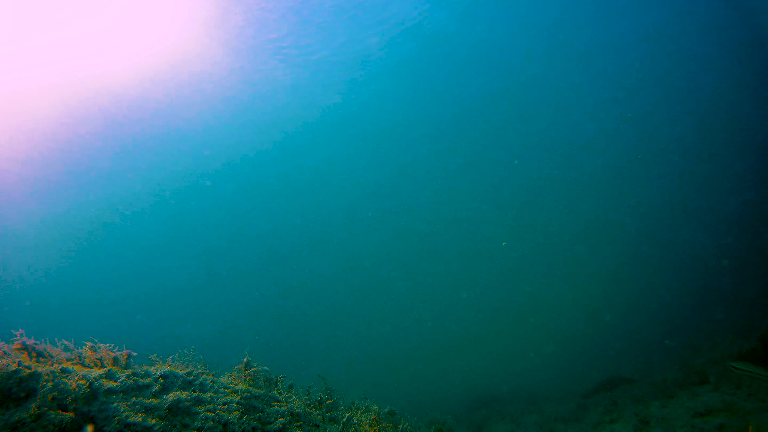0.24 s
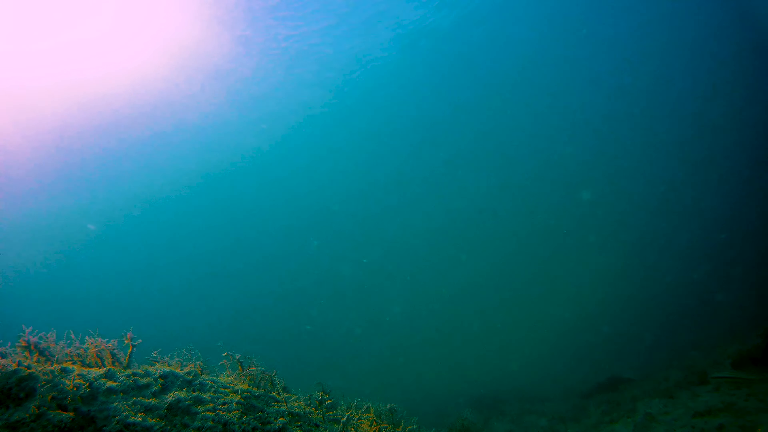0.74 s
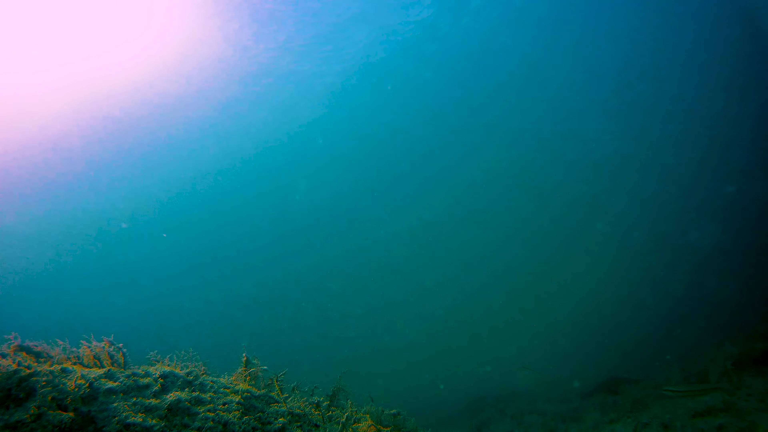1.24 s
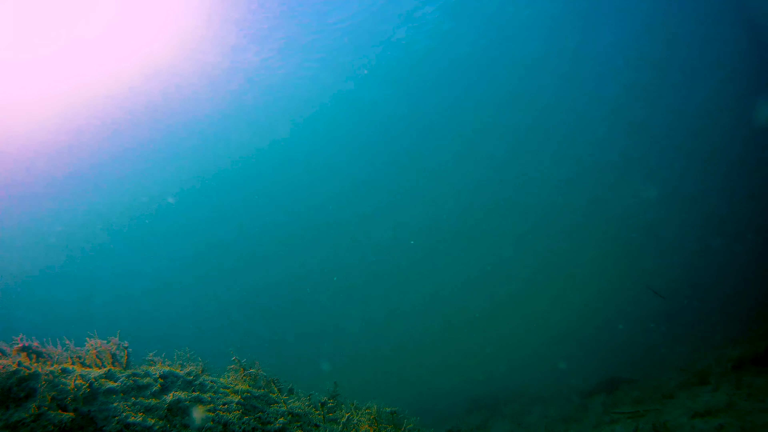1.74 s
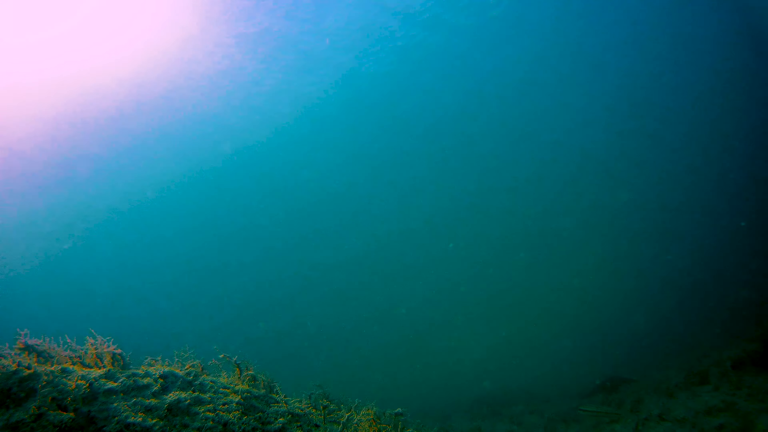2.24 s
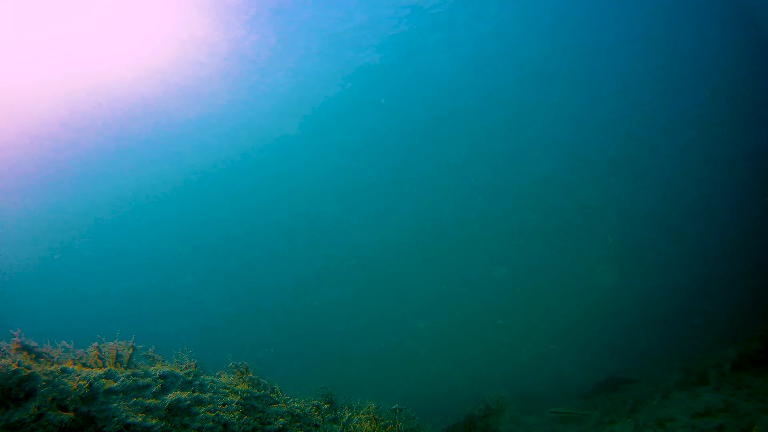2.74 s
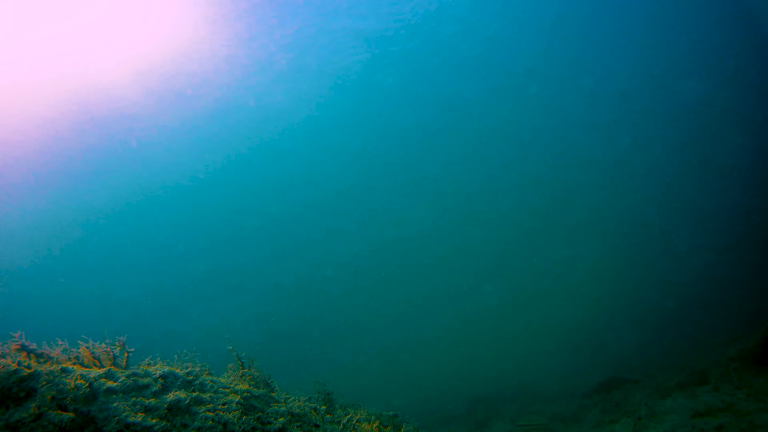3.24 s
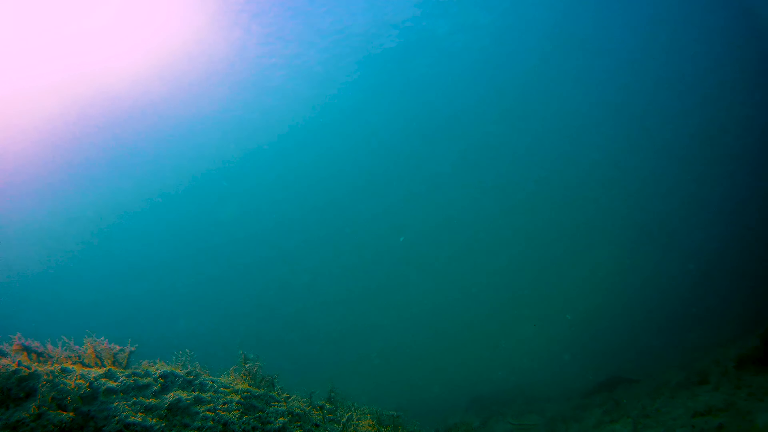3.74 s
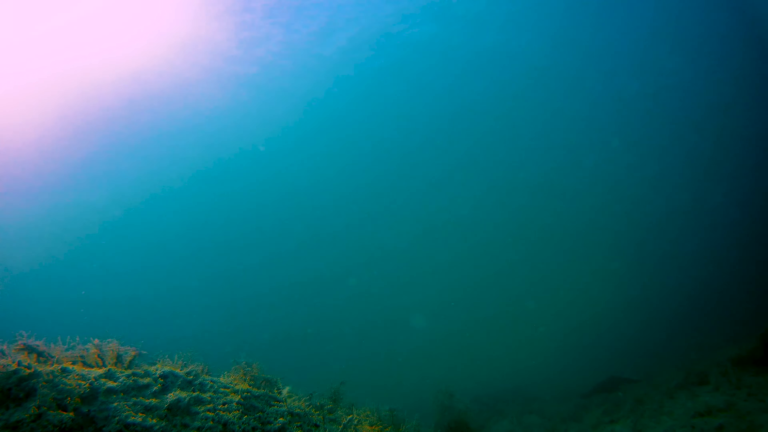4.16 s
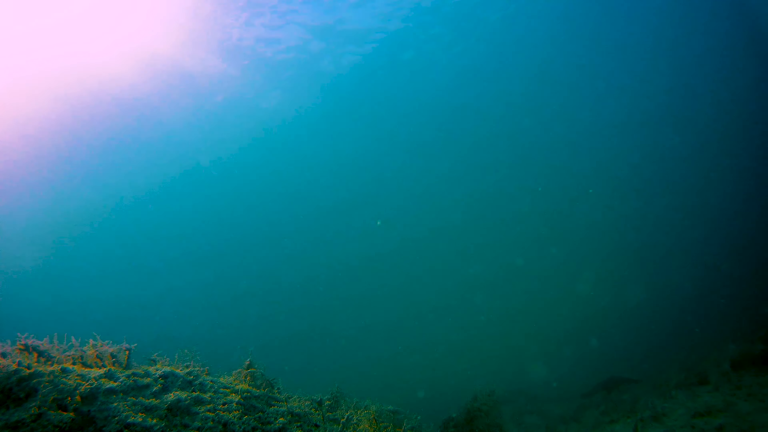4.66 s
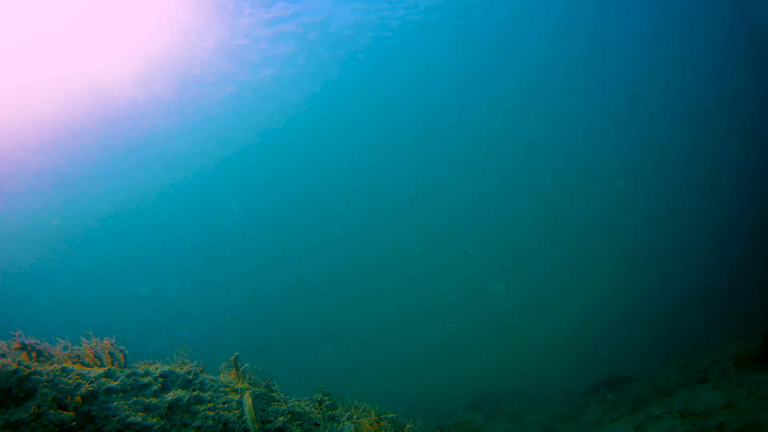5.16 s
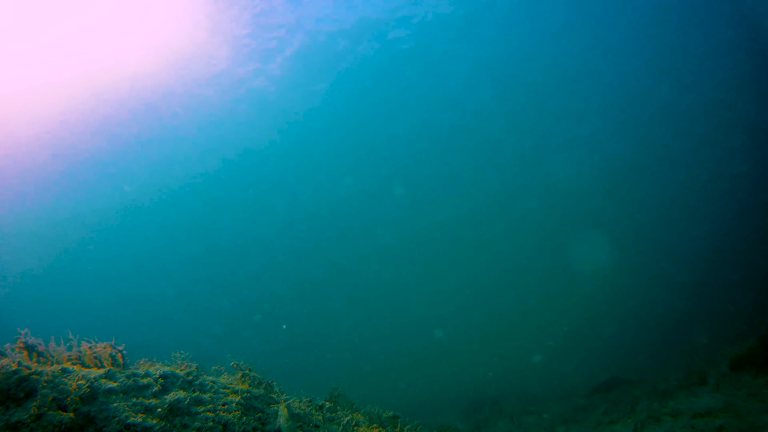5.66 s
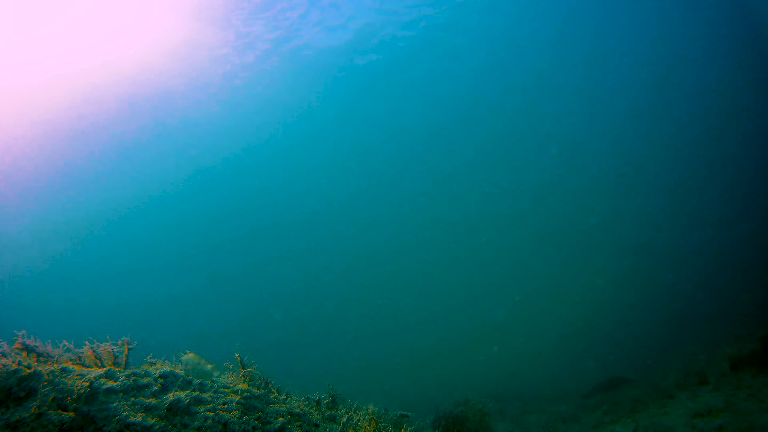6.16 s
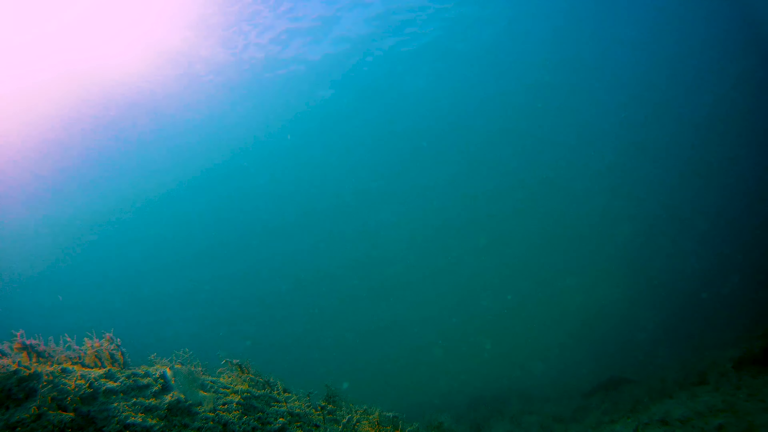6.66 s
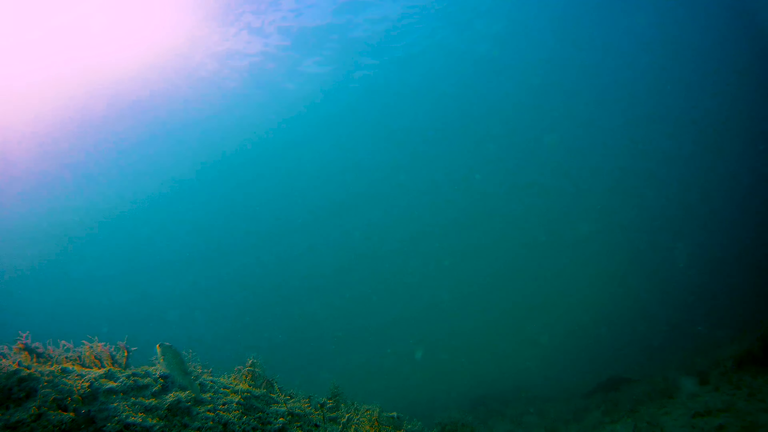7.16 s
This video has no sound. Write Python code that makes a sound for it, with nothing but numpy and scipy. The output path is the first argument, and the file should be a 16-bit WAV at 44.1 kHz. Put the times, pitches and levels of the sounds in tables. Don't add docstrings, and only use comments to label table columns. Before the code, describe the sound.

Muffled, bass-heavy underwater sound, very close and enclosed. Low throbbing surges rock the mount while turbulent water buffets and slaps the casing. Tiny dry ticks, glassy snaps and faint gritty crackle run all along, with occasional dull bumps. The current eases past the middle, exposing the ticks, then comes a small pebble knock, a soft low thud and swelling flow again.

```python
import sys
import numpy as np
from scipy import signal
from scipy.fft import rfft, irfft
from scipy.io import wavfile
from scipy.ndimage import uniform_filter1d

SR = 44100
rng = np.random.default_rng(int(sys.argv[2]) if len(sys.argv) > 2 else 0)


def decibels_to_gain(level_db):
    exponent = np.asarray(level_db, float) / 20
    return 10 ** exponent


def transcribe(u):
    v = np.clip(np.atleast_2d(u).T, -1, 1)
    q = np.round(v * 32767).astype(np.int16)
    wavfile.write(sys.argv[1], SR, q)


N = 325899

# frequency in Hz, density in dB per Hz.
HISS_SPECTRUM = [(410, -19), (700, 1.5), (1100, -4.5), (1650, -8), (3320, -14.5), (4590, -17),
                 (6440, -19.5), (15600, -21)]
HISS_DB = -61

# time in seconds, level in dB.
HEAVE_LEVEL = [(0.0, -45), (0.08, -62), (0.14, -46), (0.25, -42), (1.11, -50), (1.17, -42), (1.54, -58),
               (2.86, -38), (3.04, -52), (3.81, -41), (3.93, -52), (4.4, -45), (4.47, -53), (5.02, -43),
               (5.72, -53), (5.86, -36), (5.91, -45), (7.39, -41)]
HEAVE_HZ, HEAVE_GAIN_DB = 64, 1

# mode in Hz, level in dB, T60 in seconds.
BACK_MODES = [(1052, -7, 0.01), (1290, -11, 0.028), (1439, -1.5, 0.024), (1637, -2, 0.027)]
SIDE_MODES = [(1970, -2.5, 0.021), (2295, -1.5, 0.019), (2660, -3.5, 0.016), (2986, -7.5, 0.015)]
PORT_MODES = [(3330, -7, 0.0067), (3694, -10, 0.014), (3880, -1.5, 0.013), (4116, -2, 0.012)]
RIM_MODES = [(4560, -14, 0.0081), (4910, -12, 0.018), (5333, -6.5, 0.019), (5585, -4.5, 0.01),
             (5836, -4.5, 0.015), (5970, -14, 0.01), (6520, -20, 0.0053)]
LENS_MODES = [(6860, 3, 0.0085), (7550, 3.5, 0.0086), (7800, -4.5, 0.0055), (9170, -1.5, 0.011),
              (10180, 1.5, 0.0095), (10920, 2.5, 0.0085), (13800, 3, .006)]

# start in seconds, strength in dB, walls in dB re strength.
RIM_GRAINS = [(0.0362, -33.5, -12), (0.128, -51, -6), (0.1734, -43.5, -10), (0.1994, -51, -18),
              (0.2833, -50.5, -4), (0.383, -53, -8), (0.8203, -46, -15), (0.923, -50.5, -8),
              (1.121, -47.5, -22), (1.3646, -48.5, -9), (1.3758, -47.5, -1.5), (1.5955, -42.5, -7.5),
              (1.8083, -48.5, -7), (1.8673, -41, -14), (2.0468, -41, -4), (2.121, -41.5, -12),
              (2.642, -37, -4), (3.2694, -42, -7.5), (3.5318, -43, -9.5), (3.801, -40.5, -11.5),
              (4.577, -45, -8), (4.75, -41.5, -5.5), (4.8189, -41.5, -17), (4.9309, -45, -7),
              (5.222, -40, -6.5), (5.229, -33.5, -13.5), (5.7344, -46, -11), (6.0611, -47, -10),
              (6.3828, -36, -12.5), (6.7316, -49, -5)]
# start in seconds, strength in dB, side wall and rim in dB re strength.
BACK_GRAINS = [(0.4289, -39.5, -3.5, -12), (0.4346, -39, -5, -9), (0.517, -42, -15, -24),
               (0.521, -42.5, -15, -10.5), (0.5379, -37, -3.5, -18), (0.6674, -46.5, -8, -5.5),
               (0.9484, -45, -6, -11), (1.4006, -34, -13, -28), (2.1267, -47, -14, -22),
               (2.81, -51, -1, -0.5), (3.978, -46.5, 0, -11), (4.2242, -41.5, -11, -16),
               (4.273, -46, -5, -3.5), (4.534, -43, -7, -19.5), (4.588, -39, -14, -22),
               (4.5924, -43.5, -10, -16.5), (4.7561, -53, -6, -9), (5.0435, -41, -13, -21),
               (5.055, -45.5, -5, -7), (5.44, -51.5, 2, -8), (5.5587, -43.5, -2, -9), (5.979, -45, -9, -12),
               (6.4652, -42, -14.5, -21), (6.6018, -36, -6, -18), (7.0652, -43.5, -6, -17),
               (7.0782, -44.5, -5, -12), (7.1481, -37.5, -6, -15), (7.214, -46.5, -2.5, -5)]
# start in seconds, strength in dB, back wall and rim in dB re strength.
SIDE_GRAINS = [(0.353, -39.5, -11, -14), (1.715, -39, -15, -17), (2.2302, -41, -24, -11),
               (2.27, -41, -12, -8.5), (2.37, -41.5, -17, -16), (2.6759, -49, -3, -10),
               (3.244, -49, -1, -10), (3.8142, -44, -14, -16), (4.3212, -49.5, -9, -8),
               (4.9608, -39, -13, -6), (5.211, -38.5, -8, -13), (5.76, -52.5, -2, 2),
               (6.268, -47.5, -17, -11), (6.4889, -47.5, -6, -6), (7.098, -44.5, -13, -6),
               (7.105, -44.5, -8, -8)]
# start in seconds, strength in dB, walls and rim in dB re strength.
PORT_GRAINS = [(0.9028, -51.5, -3, -2), (1.669, -52, 1, 1.5), (1.978, -48.5, -3, -2), (2.8801, -49, -6, 7),
               (2.8862, -40, -10, -3), (3.0136, -40.5, -0.5, -19), (3.256, -57, 1, 1),
               (3.3128, -52.5, -3, 2), (4.0443, -53, 4, 1), (4.0509, -51.5, 6, 2), (4.0581, -42.5, 2, -7.5),
               (4.2776, -47, 0, 0.5), (4.4658, -54.5, 0, 3.5), (6.844, -48, -2.5, -3)]
# start in seconds, strength in dB, walls in dB re strength.
RIM_SPECKS = [(0.2294, -48, -16), (0.418, -49, -8), (0.6165, -53, -12), (0.6938, -48, -4),
              (0.7432, -50, -8), (0.892, -45, -10), (0.9866, -53.5, -8), (1.071, -45, -11),
              (1.3324, -49, -6), (1.4416, -53, -8), (1.4626, -49, -10), (1.6222, -49, -8),
              (1.8452, -46, -9), (2.0701, -48, -8), (2.4708, -53, -5), (2.5765, -50, -8), (2.7217, -49, -6),
              (3.0053, -49, -4), (3.1382, -54, -8), (4.3046, -44, -11), (4.3982, -51, -8),
              (4.4877, -48, -5), (4.859, -50, -8), (4.9232, -43.5, -8), (5.1028, -49, -8.5),
              (5.1277, -46, -12), (5.719, -47, -5), (5.8731, -49, -6), (6.0851, -52, -9), (6.3344, -58, -8),
              (6.5547, -51, -3), (6.7456, -45, -9), (6.9008, -47, -8)]
# start in seconds, strength in dB, side wall and rim in dB re strength.
WALL_SPECKS = [(0.8036, -47, -3, -16), (2.9138, -45, -7, -8), (3.2337, -42.5, -3, -17),
               (3.4293, -46, -3, -12), (3.4835, -47, 0, -12), (3.576, -50.5, 4.5, -2),
               (3.7493, -48, -3, -8), (3.8776, -45, -5, -10), (4.0157, -48, -3, -14),
               (4.2068, -44, -4, -15), (4.2462, -48, -6, -15), (4.348, -48, -1, -12),
               (4.6818, -49, -3, -12), (4.8967, -54, -3, -14), (5.1163, -48, -5, -12),
               (5.5179, -45.5, -5, -12), (5.7922, -45, -2, -8), (6.4275, -50, 0, -12),
               (6.6864, -52, -3, -15), (6.8648, -47, -8, -14), (6.8823, -46, -4, -14),
               (6.9521, -55, -0.5, -12), (6.9805, -51, -5, -12), (7.0474, -45, -7, -7)]
# list of times in seconds, levels of back, side, port and rim in dB.
SAND = [
    ([.139, .939, 1.091, 1.639, 1.682, 1.752, 1.892, 2.257, 2.292, 2.344, 2.653, 2.915, 2.953, 2.982, 3.515, 3.705, 3.923, 4.083, 4.426, 4.46, 4.953, 5.308, 5.58, 5.649, 5.698, 5.814, 5.93, 6.022, 6.208, 6.525, 6.549, 6.919, 7.211], [-64, -62, -66, -55]),
    ([.013, .73, 1.057, 2.03, 2.144, 2.694, 3.846, 4.117, 4.145, 4.365, 5.92, 6.26, 6.726], [-62, -62, -58, -60]),
    ([.002, .68, 1.421, 2.042, 4.499, 6.482], [-50, -56, -60, -56]),
]
STRUCK_DB, COUPLED_DB, PORT_LEAK_DB, SPECK_DB = -2, 2, -4, -2.5
GRAIN_LAG_S, SAND_LEAD_S = .0006, .002

# start in seconds, strength in dB, pitch in Hz.
LENS_SNAPS = [(0.0373, -49, 7200), (0.174, -51, 7190), (0.2294, -49, 7360), (0.5222, -44, 10500),
              (0.82, -51, 6800), (1.1215, -49.5, 7650), (1.3653, -51, 6980), (1.4631, -51, 7600),
              (1.715, -46, 7400), (1.8682, -45, 7630), (1.9784, -48, 10700), (2.047, -50, 10700),
              (2.0906, -50, 10600), (2.1215, -48, 7410), (2.2298, -42, 6900), (3.3129, -48, 6830),
              (3.5324, -48, 7010), (4.3211, -49, 10600), (4.4648, -51, 6820), (4.5775, -46, 6820),
              (4.7501, -44, 6986), (4.9227, -52, 10840), (5.2218, -51, 7490), (5.2932, -49, 7610),
              (5.6332, -49, 7350), (5.7344, -48, 9170), (6.0621, -50, 7460), (6.3834, -49, 7680),
              (6.6019, -40, 7350), (6.7321, -50, 6800), (7.1048, -50, 8960), (7.1277, -51, 7240),
              (7.1487, -50, 7550)]
SNAP_DB, SNAP_T60_S = 4, .009

# mode in Hz, level in dB, T60 in seconds.
PEBBLE_MODES = [(297, -32, 0.045), (410, -22, 0.04), (525, -15.5, 0.041), (664, -16.5, 0.03),
                (870, -23.5, 0.033), (1266, -21, 0.03), (1385, -15.5, 0.027), (1660, -13, 0.024),
                (1950, -22, 0.024), (2390, -29, 0.017)]
# mode in Hz, level in dB, T60 in seconds.
THUD_MODES = [(820, -38, 0.03), (667, -29, 0.045), (561.7, -26, 0.075), (488, -40, 0.045),
              (401, -26.5, 0.092), (347, -34, 0.11), (270, -25.5, 0.072), (188, -36.5, 0.12),
              (122, -18.5, 0.15), (90, -25, 0.2)]
PEBBLE_S, THUD_S = 5.2929, 5.764
# start in seconds, mode in Hz, level in dB, T60 in seconds.
BUMPS = [(.008, 1040, -42.5, 0.074), (.075, 506, -20, 0.044), (0.075, 850, -40, 0.041),
         (0.27, 122, -29, 0.25), (0.873, 630, -45, 0.037), (1.024, 270, -21.5, 0.05),
         (2.001, 147, -37, 0.17), (2.809, 510, -25, 0.034), (3.383, 650, -34, 0.045),
         (4.528, 129, -36, 0.26), (4.76, 129.5, -31, 0.13), (4.772, 330, -36, 0.055),
         (4.751, 670, -39, 0.046), (5.991, 122, -32, 0.2), (6.36, 120, -35, .15),
         (7.065, 120.3, -25.5, 0.15), (0.5383, 2050, -36, .022), (1.401, 1450, -38, .03),
         (2.371, 2300, -43, .02), (6.4655, 1451, -43, .03), (5.785, 350, -32, 0.11), (5.8, 150, -31, .12),
         (5.804, 420, -40, 0.06), (7.045, 352, -39, 0.1), (7.0646, 1620, -46, .03)]

# start in seconds, level in dB, mode in Hz.
SLAPS = [(0.076, -32, 450), (0.2, -36, 200), (0.311, -30, 218), (0.6, -31, 84), (0.684, -31, 178),
         (0.816, -33, 253), (1.02, -31, 221), (1.158, -30, 226), (1.479, -27, 285), (1.616, -33, 186),
         (1.696, -33, 240), (1.817, -26, 223), (1.93, -32, 151), (2.161, -35, 164), (2.485, -29, 153),
         (2.53, -30, 85), (2.593, -31, 204), (2.704, -27, 181), (3.414, -33, 176), (3.536, -32, 199),
         (3.882, -33, 183), (3.31, -33, 82), (5.768, -32, 400), (6.218, -31, 207.1)]
SLAP_DB, SLAP_CYCLES = -4, 16

# time in seconds, strength in dB, share of small eddies in dB.
FLOW = [(0.0, 0, 1.5), (0.41, 1.5, -3), (1.21, 2, -0.5), (1.46, 2, -1), (2.12, -0.5, 1), (2.47, 3.5, -2.5),
        (2.72, 0.5, -0.5), (3.46, 0, -0.5), (4.2, -1, -2.5), (4.49, -9, -0.5), (4.94, -15.5, 0.5),
        (5.54, -15, -0.5), (6.01, -5.5, -3.5), (6.75, -8.5, -3.5), (7.22, -2, -1.5), (7.39, 0.5, -6.5)]
# centre in Hz, width in Hz, level in dB.
BUFFET_BANDS = [(27.1, 7, -2.5), (42.8, 11.6, -2.5), (63.3, 7.4, -12)]
DEEP_BANDS = [(68.4, 16, -1.5), (87.2, 20.5, -1.5), (122, 23.3, -4), (332.2, 25, -15)]
DRUM_BANDS = [(173.7, 48, 0.5), (218.4, 77, 0), (304, 80, -5)]
PATTER_BANDS = [(432, 55, -5), (500, 124, 4), (654.6, 59, -5), (709, 28, -12), (873, 92, -16.5),
                (1243, 39, -17.5), (1425, 83, -19), (1665, 99, -23)]
DRUM_DB, PATTER_DB, DEEP_DB, BUFFET_DB = -43.5, -49, -45.5, -41
PATTER_DB_PER_DB, DEEP_DB_PER_DB = 0.7, 0.27

# time in seconds, frequency in Hz.
LOW_PITCH = [(0.0, 32.5), (0.29, 34.5), (1.81, 35), (2.57, 32), (3.7, 31.5), (4.16, 35.5), (4.61, 33.5),
             (5.41, 32), (6.09, 36.5), (6.79, 33.5), (7.29, 35.5), (7.39, 43)]
HIGH_PITCH = [(0.0, 50), (0.25, 55.1), (0.35, 51.68), (1.44, 51.94), (1.56, 49.2), (1.91, 54.56),
              (3.38, 50.77), (3.5, 55.47), (4.57, 53.37), (4.69, 46.8), (4.79, 50.38), (5.41, 50.5),
              (5.6, 54.81), (6.79, 52.55), (7.0, 59.7), (7.18, 52.2), (7.39, 52.8)]
# crest in seconds, level in dB,
# build-up and fade in seconds per 10 dB.
LOW_SURGES = [(0.1, -38, 7, 1.5), (.37, -27, 0.5, 0.04), (.72, -27, 0.2, 0.07), (.88, -27, -0.8, 0),
              (1.29, -29, -0.1, 0.3), (2.1, -31.5, 0.26, 0.4), (2.3, -31.5, -0.5, 3.5),
              (3.04, -27, 0.2, 0.7), (3.93, -26.5, 0.2, -0.5), (4.28, -28.5, -0.5, 1.2),
              (4.75, -27.5, 1.2, 0.2), (5.11, -25, 0.06, 0.05), (5.3, -32.5, 2, -0.1),
              (5.68, -33, -0.74, 0.4), (5.91, -23.5, 0, -0.46), (6.1, -29, 0.02, .5), (6.3, -29, 0.47, -2),
              (6.46, -27.5, 0.5, -0.2), (6.62, -28, 0.2, 0.7), (7.0, -27.5, 1.1, 0.3),
              (7.22, -23.5, 0.14, 0.16)]
HIGH_SURGES = [(.08, -25, 0.068, 0.14), (.54, -21.5, 0.12, 0.12), (.88, -26.5, .25, 0.23),
               (1.42, -24.5, 0.06, 0.11), (1.83, -26.5, 0.39, 0.14), (2.1, -28.5, 0.27, 0.066),
               (2.51, -25.5, 0.23, 0.13), (2.82, -27, 0.1, 0.27), (3.24, -26, 0.11, 0.078),
               (3.52, -24.5, 0.066, 0.074), (3.85, -29.5, 0.22, 0.21), (4.14, -23.5, 0.14, 0.18),
               (4.45, -24, .35, 0.15), (4.76, -27, 0.038, 0.26), (5.0, -22, 0.18, 0.048),
               (5.14, -27, 0.12, 0.055), (5.33, -25.5, 0.12, 0.091), (5.7, -29.5, 0.28, 0.23),
               (6.11, -27.5, 0.044, 0.11), (6.32, -29.5, 0.061, 0.2), (6.71, -30.5, 0.1, .09),
               (7.11, -31.5, 0.041, 0.34), (7.25, -35.5, 0.36, 0.098)]

DULL_START_S = [.017, .53, 2.225, 2.641, 2.865, 2.993, 3.792, 4.738, 5.187, 5.211, 5.235, 5.259, 5.282,
                6.371, 6.594, 7.139]
DULL_LENGTH_S = .029


def unit(x):
    return x / np.sqrt(np.mean(x ** 2))


def curves(table):
    s, *columns = np.transpose(table)
    return [np.interp(np.arange(N) / SR, s, c) for c in columns]


def walk(rate_hz):
    hold = int(SR / rate_hz)
    steps = np.repeat(rng.standard_normal(N // 50), hold)[:N + hold]
    slewed = uniform_filter1d(uniform_filter1d(steps, hold), hold)
    return unit(slewed[:N])


def resonance(x, hz, width_hz):
    return signal.lfilter(*signal.iirpeak(hz, hz / width_hz, SR), x)


def ring(hz, db, t60_s, rise_s):
    t = np.arange(8192 if t60_s > .03 else 2048) / SR
    envelope = decibels_to_gain(db - 60 * t / t60_s) * (1 - np.exp(-t / rise_s)) ** 2
    return envelope * np.sin(2 * np.pi * hz * t)


def add(out, s, sound):
    i = int(s * SR)
    out[i:i + len(sound)] += sound[:len(out) - i]


def hiss():
    hz, db = np.transpose(HISS_SPECTRUM)
    bin_hz = np.arange(N // 2 + 1) * SR / N + 1
    colour = decibels_to_gain(np.interp(np.log(bin_hz), np.log(hz), db))
    noise = unit(irfft(rfft(rng.standard_normal(N)) * colour, N))
    return decibels_to_gain(HISS_DB + 1.6 * walk(35)) * noise


def heave():
    wobble_rad = 1.3 * walk(7)
    level = decibels_to_gain(curves(HEAVE_LEVEL)[0] + HEAVE_GAIN_DB)
    return np.sqrt(2) * level * np.sin(2 * np.pi * HEAVE_HZ * np.arange(N) / SR + wobble_rad)


def tick(levels_db, chance):
    groups = zip((BACK_MODES, SIDE_MODES, PORT_MODES, RIM_MODES, LENS_MODES), levels_db)
    modes = [(hz, db + level, t60) for group, level in groups for hz, db, t60 in group]
    out = 0
    for (hz, db, t60), (sign, detune, size) in zip(modes, chance):
        mode = ring(hz * (1 + .02 * detune), db + 2.8 * size, t60, 0.00036)[:2048]
        out = out + np.sign(sign + .8) * mode
    return out


def crackle(count=14):
    out, gust = np.zeros(N), decibels_to_gain(3.5 * walk(14))
    for _ in range(count):
        size_db = np.minimum(4 * rng.exponential(size=N), 6)
        strikes = (rng.random(N) < 26 * gust / SR) * decibels_to_gain(size_db)
        levels_db = [-71.5, -72, -73.5, -68, -76] + 4.94 * rng.standard_normal(5)
        body = tick(levels_db, rng.standard_normal((26, 3)))
        out += signal.oaconvolve(strikes, body)[:N]
    return out


def landings():
    lead, near = STRUCK_DB, COUPLED_DB

    def port(side, rim):
        return min(side, rim) + near + PORT_LEAK_DB

    rows = []

    def land(s, db, *parts_db):
        rows.append((s, db + np.array(parts_db)))

    for s, db, wall in RIM_GRAINS:
        land(s, db, wall, wall, port(wall, 0), lead)
    for s, db, side, rim in BACK_GRAINS:
        land(s, db, lead, side + near, port(side, rim), rim + near)
    for s, db, back, rim in SIDE_GRAINS:
        land(s, db, back + near, lead, port(0, rim), rim + near)
    land(PEBBLE_S - GRAIN_LAG_S, 0, -58, -58, -49, -41.5)
    for s, db, wall, rim in PORT_GRAINS:
        land(s, db, wall, wall, lead, rim + near)
    for s, db, wall in RIM_SPECKS:
        land(s, db + SPECK_DB, wall, wall, port(wall, 0), lead)
    for s, db, side, rim in WALL_SPECKS:
        land(s, db + SPECK_DB, lead, side, port(side, rim), rim)
    for times_s, levels_db in SAND:
        for s in times_s:
            land(s - SAND_LEAD_S, 0, *levels_db)
    return rows


def ticks():
    out = np.zeros(N)
    chance, spin = rng.standard_normal((200, 2, 26, 3)), rng.random((200, 2))
    for (s, levels_db), c, (late, glance) in zip(landings(), chance, spin):
        lens_db = max(levels_db[-1], levels_db[1] - 5.5) + 12 * glance
        levels_db = np.append(levels_db, lens_db) + [2.0, 2.0, 4.0, 3.5, -20]
        add(out, s + GRAIN_LAG_S, tick(levels_db, c[0]))
        add(out, s + .002 + 0.0067 * late, tick(levels_db - 14, c[1]))
    return out


def snaps():
    out = np.zeros(N)
    for (s, db, hz), spread in zip(LENS_SNAPS, rng.standard_normal((60, 3))):
        for d in (0, *spread):
            mode_hz = min(hz * (1 + .07 * d), 15000)
            add(out, s, ring(mode_hz, db + SNAP_DB - 4 * abs(d), SNAP_T60_S, 0.00016) / 3)
    return out


def knocks():
    out = np.zeros(N)
    for hz, db, t60 in PEBBLE_MODES:
        add(out, PEBBLE_S + .12 / hz, np.sign(1500 - hz) * ring(hz, db, t60, .0007 + 0.25 / hz))
    for k, (hz, db, t60) in enumerate(THUD_MODES):
        add(out, THUD_S + 1.64 / hz, (-1) ** k * ring(hz, db, t60, 0.9 / hz))
    for s, hz, db, t60 in BUMPS:
        add(out, s, ring(hz, db, t60, 0.68 / hz))
    return out


def slaps():
    out = np.zeros(N)
    for s, db, hz in SLAPS:
        add(out, s, ring(hz, db + SLAP_DB, SLAP_CYCLES / hz, 0.99 / hz))
    return out


def eddies(bands, flicker_db, rate_hz):
    out = 0
    for hz, width_hz, db in bands:
        once = resonance(rng.standard_normal(N), hz, width_hz)
        twice = resonance(once, hz, 1.19 * width_hz)
        out = out + decibels_to_gain(db + flicker_db * walk(rate_hz)) * unit(twice)
    return unit(out)


def current():
    current_db, small_db = curves(FLOW)
    drum = decibels_to_gain(DRUM_DB + current_db) * eddies(DRUM_BANDS, 1.7, 12)
    patter_db = PATTER_DB + PATTER_DB_PER_DB * current_db + small_db
    patter = decibels_to_gain(patter_db) * eddies(PATTER_BANDS, 1.4, 13)
    deep = decibels_to_gain(DEEP_DB + DEEP_DB_PER_DB * current_db) * eddies(DEEP_BANDS, 1.0, 7.2)
    buffet = decibels_to_gain(BUFFET_DB) * eddies(BUFFET_BANDS, 2.8, 6.5)
    return drum + patter + deep + buffet


def swell(surges):
    t = np.arange(0, N, 64) / SR
    swing_db = []
    for s, db, rise, fade in surges:
        before, after = (s - t) / max(rise, .01), (t - s) / max(fade, .01)
        swing_db.append(db - 10 * np.where(t < s, before, after))
    crest_db = uniform_filter1d(np.max(swing_db, axis=0), size=25)
    return np.interp(np.arange(N) / SR, t, decibels_to_gain(1.37 + crest_db))


def sway(pitch, surges):
    wobble_db, wobble_rad = 1. * walk(12), .3 * walk(9)
    phase_rad = 2 * np.pi * np.cumsum(curves(pitch)[0]) / SR + wobble_rad
    return np.sqrt(2) * swell(surges) * decibels_to_gain(wobble_db) * np.sin(phase_rad)


def scene():
    mount = sway(LOW_PITCH, LOW_SURGES) + sway(HIGH_PITCH, HIGH_SURGES) + heave()
    grains = crackle() + ticks() + snaps()
    return (hiss() + grains + knocks() + slaps() + current() + mount)[None]


def moth_holes(x, size=1024):
    overlap = size - size // 4
    hz, _, z = signal.stft(x, SR, nperseg=size, noverlap=overlap)
    cells = rng.random((size // 8, z.shape[-1] // 8 + 1))
    cells = np.kron(cells, np.ones((5, 8)))[:len(hz), :z.shape[-1]]
    share = np.interp(hz, [10000, 12500, 15200, 15750], [0, .1, .15, .8])
    kept = np.where(cells < share[:, None], decibels_to_gain(-28), 1)
    return signal.istft(z * kept, SR, nperseg=size, noverlap=overlap)[1][:, :N]


def treble_gaps(x):
    lowpass = signal.ellip(8, .05, 35, 8500, fs=SR, output="sos")
    dull = signal.sosfiltfilt(lowpass, x)
    t = np.arange(N) / SR
    gaps = np.any([(t > s) & (t < s + DULL_LENGTH_S) for s in DULL_START_S], axis=0)
    fade = uniform_filter1d(1. * gaps, size=128)
    return x + (1 - decibels_to_gain(-33)) * fade * (dull - x)


def roll_off(x):
    return signal.sosfilt(signal.butter(12, 15710, fs=SR, output="sos"), x)


def record(dry):
    highpass = signal.butter(2, 22, "high", fs=SR, output="sos")
    holed = moth_holes(signal.sosfilt(highpass, dry))
    mix = treble_gaps(holed)
    return roll_off(mix)


dry = scene()
out = record(dry)
transcribe(out)
```